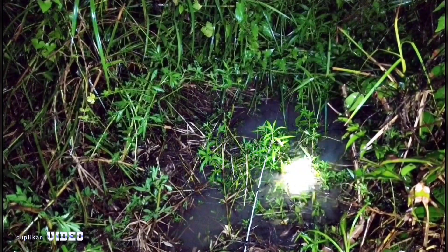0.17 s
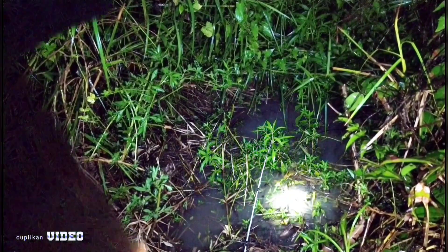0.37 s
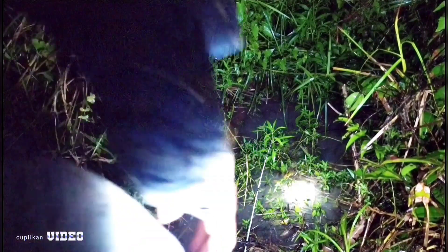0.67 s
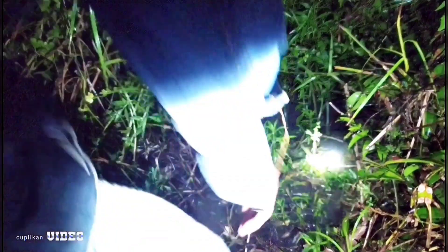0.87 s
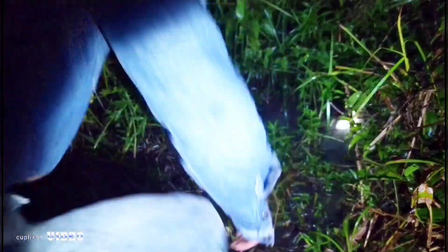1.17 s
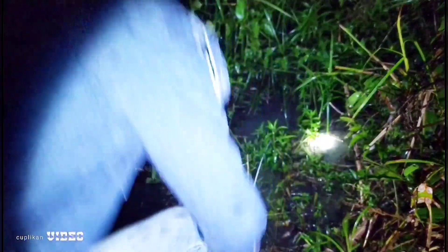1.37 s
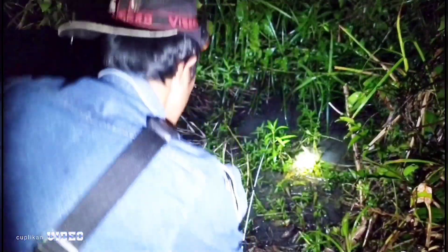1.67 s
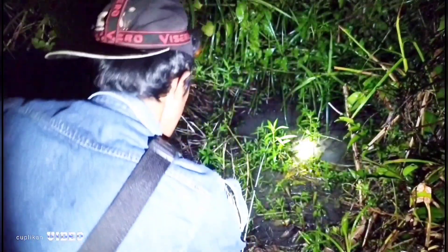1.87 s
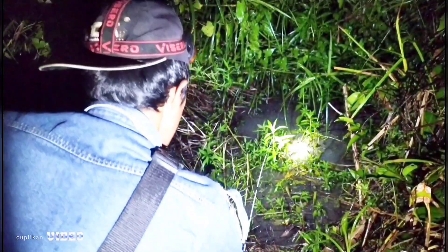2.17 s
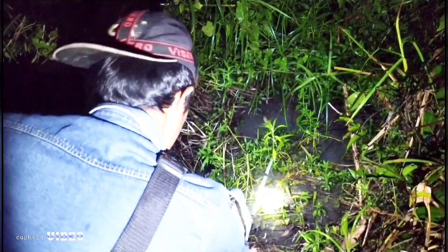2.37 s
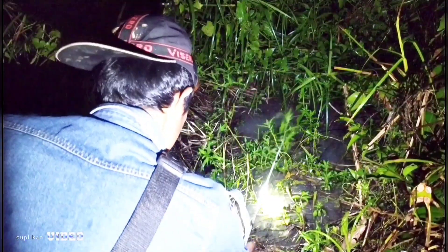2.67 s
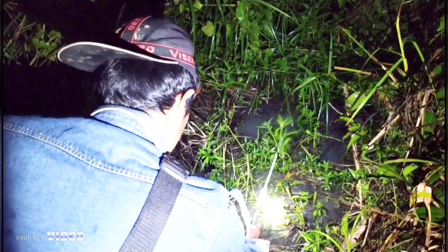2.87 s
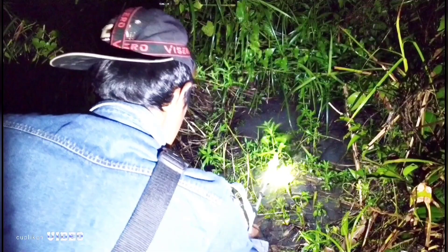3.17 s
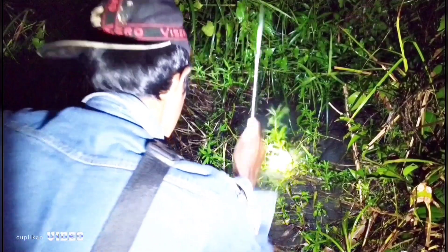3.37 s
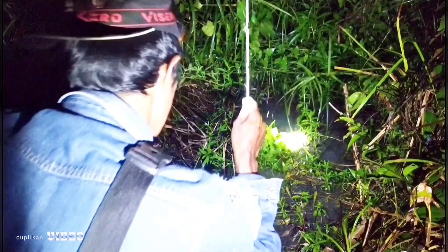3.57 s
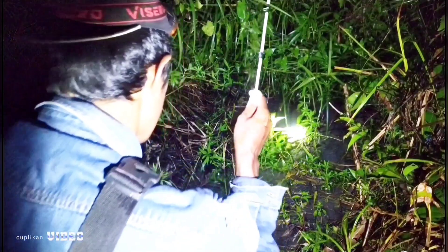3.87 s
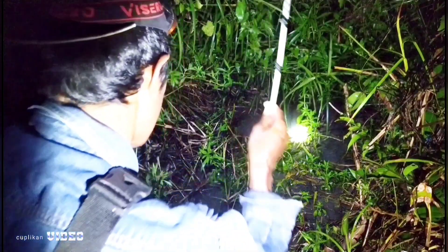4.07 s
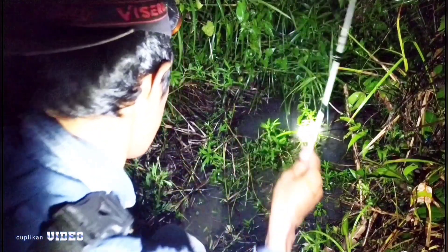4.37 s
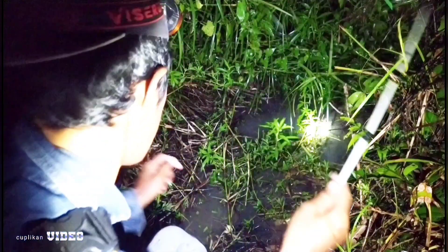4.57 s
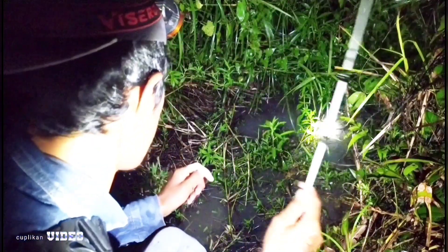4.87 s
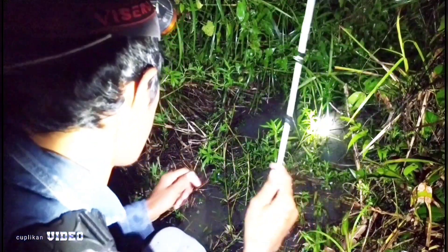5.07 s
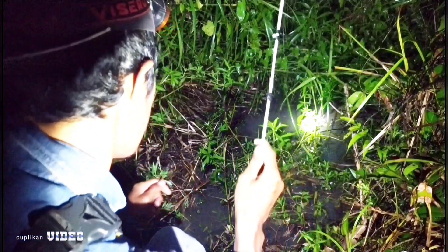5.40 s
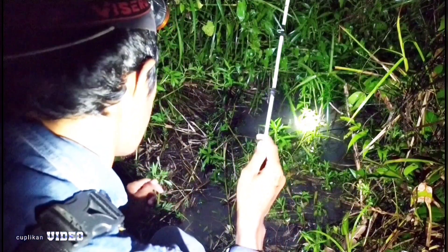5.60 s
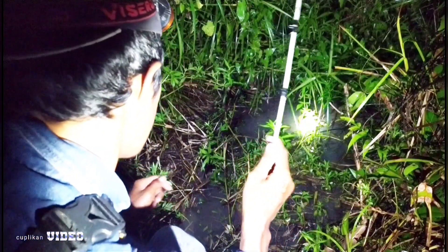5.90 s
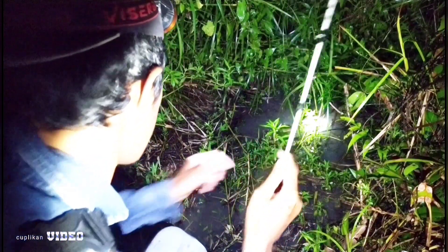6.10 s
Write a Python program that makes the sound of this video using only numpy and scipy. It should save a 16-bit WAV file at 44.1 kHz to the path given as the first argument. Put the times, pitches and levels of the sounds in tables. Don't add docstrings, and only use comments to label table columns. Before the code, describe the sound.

Shrill crickets drone throughout an open wet place at night. First a near frog peeps brightly about five times a second, while another rattles across the water and low hoarse pipes sound on the left. Feet press soggy ground, blades hiss on cloth and stems snap, ending in a crackling tear. Then fainter frogs alternate, a stronger rattle joins on the right, and tiny bubbles blip near the end. A weak distant engine hum wavers underneath; two spaced microphones.

```python
import sys
import numpy as np
from scipy import signal
from scipy.io import wavfile
from scipy.ndimage import uniform_filter1d

SR = 44100
rng = np.random.default_rng(int(sys.argv[2]) if len(sys.argv) > 2 else 0)


def decibels_to_gain(level_db):
    exponent = np.asarray(level_db, float) / 20
    return 10 ** exponent


def to_wav(s):
    ch = np.atleast_2d(s).T
    pcm = np.round(np.clip(ch, -1, 1) * 32767)
    wavfile.write(sys.argv[1], SR, pcm.astype(np.int16))


N = 275182


def evened(x):
    return x / np.sqrt(np.mean(x ** 2) + 1e-20)


def read(points, hz):
    f, value = np.transpose(points)
    return np.interp(np.log(hz + 1), np.log(f + 1), value)


def follow(rows):
    s, value = np.transpose(rows)
    return np.interp(np.arange(N) / SR, s, value)


def add(mix, s, sound):
    part = mix[..., round(s * SR):][..., :sound.shape[-1]]
    part += sound[..., :part.shape[-1]]


def resonate(x, hz, width):
    r = np.exp(-np.pi * width / SR)
    bend = 2 * r * np.cos(2 * np.pi * hz / SR)
    return signal.lfilter([2 * (1 - r), -bend * (1 - r)], [1, -bend, r ** 2], x)


def roughness(size):
    return evened(uniform_filter1d(rng.standard_normal(N), size=size))


def hiss(spectrum, patchy_db, flicker_db, same):
    frames, hz = N // 128 + 5, np.fft.rfftfreq(512, 1 / SR)
    a, b, c, d, patches = rng.standard_normal((frames, 257, 5)).T
    patches = uniform_filter1d(patches, size=6, axis=0)
    patches = evened(uniform_filter1d(patches, size=16, axis=1))
    alike = np.clip(read(same, hz), -1, 1)[:, None]
    left = a + 1j * b
    right = alike * left + np.sqrt(1 - alike ** 2) * (c + 1j * d)
    flicker = flicker_db * rng.standard_normal(frames)
    z = np.array([left, right]) * decibels_to_gain(read(spectrum, hz)[:, None] + patchy_db * patches + flicker)
    return evened(signal.istft(z, nperseg=512, noverlap=384)[1][:, :N])


def reeds(x, t60):
    at = np.arange(200, 12000, 20) + rng.integers(0, 20, (2, 590))
    echoes = rng.choice([-1., 1.], at.shape) * decibels_to_gain(-60 * at / SR / t60)
    taps = np.zeros((2, 12100))
    np.put_along_axis(taps, at, echoes, axis=1)
    return signal.fftconvolve(x, taps / np.linalg.norm(taps[0]), axes=1)[:, :N]


def breeze():
    rumble = resonate(rng.standard_normal((2, N)), 28, 35)
    return decibels_to_gain(-60.0) * evened(resonate(rumble, 30, 35))


# pitch_hz, likeness
FAR_LIKENESS = [(30, 0.51), (100, 0.95), (200, 0.85), (500, -0.54), (1400, -0.51), (2500, -0.083),
                (15000, 0.0067)]
# pitch_hz, level_db per Hz
NIGHT_COLOUR = [(12, -38), (20, 2), (161, 1.5), (265, -20.5), (639, -45), (1690, 2), (2040, -8.5),
                (2530, 0.5), (3210, -11.5), (3880, 1), (5030, -10.5), (5400, -5.5), (5800, -4), (7540, -66),
                (12800, -120)]
# time_s, level_db
NIGHT_SWELL = [(0.0, -1.1), (1.9, 1), (2.05, -0.44), (2.2, 0.033), (5.85, 1), (6.02, -1.5), (6.15, 0.66),
               (6.24, 0)]


def night_murmur():
    sound = hiss(NIGHT_COLOUR, patchy_db=1.5, flicker_db=.3, same=FAR_LIKENESS)
    return decibels_to_gain(-44.5 + follow(NIGHT_SWELL)) * sound


# pitch_hz, level_db per Hz
INSECT_COLOUR = [(7500, -21), (9000, -19), (10000, -44), (11500, 3), (14200, 12), (14800, 20), (16000, -18)]
# time_s, level_db
INSECT_SWELL = [(0.0, -4), (2.2, -2), (2.6, -1), (4.5, 1), (6.24, -1)]


def far_insects():
    sound = hiss(INSECT_COLOUR, patchy_db=1.6, flicker_db=1.2, same=FAR_LIKENESS)
    return decibels_to_gain(-51.5 + follow(INSECT_SWELL)) * sound


# time_s, level_db
ENGINE_LEVEL = [(0.0, -58), (1.1, -53), (2.0, -59), (2.75, -58), (2.92, -49.5), (3.79, -45.5),
                (4.36, -48.5), (4.8, -50.5), (4.9, -62), (5.13, -48), (5.35, -58), (6.24, -53)]


def engine_hum():
    waver_db, wander_hz = 3.2 * roughness(3000), 4 * roughness(3000)
    tone = np.sin(2 * np.pi * np.cumsum(157.8 + wander_hz) / SR)
    return decibels_to_gain(follow(ENGINE_LEVEL) - 7.0 + waver_db) * tone


# time_s, level_db
CRICKET_LEVEL = [(0.0, -43.5), (.405, -43.5), (.417, -47), (.425, -38), (.433, -42.5), (1.6, -42.5),
                 (2.22, -42.5), (2.25, -51), (2.325, -49), (2.35, -42.5), (5.46, -42), (6.24, -42.5)]
# pitch_hz, width_hz, level_db
WINGS = [(6486, 345, -6), (6707, 200, -5), (6973, 140, -5.5), (7250, 170, -6.5), (8300, 980, -11)]


def crickets():
    t, out = np.arange(N) / SR, np.zeros((2, N))
    for hz, width, db in WINGS:
        throb = 1 + 0.035 * np.sin(2 * np.pi * (rng.uniform(52, 110) * t + rng.random((2, 1))))
        struck = rng.random((2, N)) < 900 / SR
        wing = resonate(rng.standard_normal((2, N)) * struck * throb, hz, width)
        wing = resonate(resonate(wing, hz, 2 * width), hz, 2 * width)
        out += decibels_to_gain(db) * evened(wing)
    pan_db = np.array([[.8], [-.8]])
    return decibels_to_gain(follow(CRICKET_LEVEL) + 3 + pan_db) * evened(out)


# pitch_hz, width_hz, level_db
RATTLE_RINGS = [(3870, 206, 3), (3705, 430, 5.5), (3976, 830, -2.5), (1400, 31, -28), (2280, 2180, 4),
                (5035, 490, -9)]


def rattlers(rows, per_s, uneven_db, ring_hz, ring_db, body_db, lag, pan_db):
    clicks = np.zeros((2, N))
    for s, db, length, own_db, surge in rows:
        chance = rng.standard_normal((3, 56))
        t = np.cumsum(1 + 0.3 * chance[0].clip(-2, 2)) / per_s - 1 / per_s
        level_db = db - 19.2 * (t / length) ** 2
        level_db -= 0.69 * (1 - t / .009).clip(0)
        level_db += uneven_db * chance[1].clip(-2, 1.5)
        level_db += 3.5 * np.exp(-((t - surge) / .0021) ** 2)
        at = ((s + t) * SR).astype(int).clip(0, N - 1)
        clicks[:, at] = decibels_to_gain(level_db) * np.sign(chance[2]) * decibels_to_gain(np.array([[own_db], [0]]))
    tight, loose = signal.sosfilt(signal.butter(6, 1300, "high", fs=SR, output="sos"), clicks)

    def ring(x, hz, width, db):
        return decibels_to_gain(db) * resonate(resonate(x, hz, width), hz, 0.68 * width) * 900 / width

    rest = sum(ring(tight, *mode) for mode in RATTLE_RINGS[1:3])
    rest = rest + sum(ring(loose, *mode) for mode in RATTLE_RINGS[3:])
    body = decibels_to_gain(body_db) * resonate(loose, 1545, 320)
    left, right = decibels_to_gain(ring_db) * ring(tight, ring_hz, *RATTLE_RINGS[0][1:]) + rest + body
    return 12 * np.array([decibels_to_gain(pan_db / 2) * np.roll(left, int(lag)), decibels_to_gain(-pan_db / 2) * right])


# start_s, level_db
ACROSS_CALLS = [(0.098, -34.5), (0.193, -34.5), (0.302, -33), (0.4221, -33), (0.53, -35), (0.639, -45.5),
                (0.7232, -40.5), (0.891, -65), (1.322, -34), (1.455, -33), (1.5883, -34.5), (1.702, -30.5),
                (1.825, -31.5), (1.9794, -32), (2.094, -31), (2.225, -33), (2.383, -30), (2.491, -31),
                (2.602, -29), (2.7213, -29), (2.794, -36.5), (2.845, -32), (2.963, -29), (3.102, -31.5),
                (3.218, -30), (3.3414, -32.5), (3.468, -36), (3.5754, -34), (3.682, -33), (3.756, -34),
                (3.891, -35.5), (4.029, -33.5), (4.456, -31.5), (4.572, -32.5), (4.704, -31), (4.794, -40),
                (5.175, -47), (5.325, -37), (5.459, -39), (6.203, -44)]


def rattlers_across():
    rows = [(s, db, .06 if s < 2.3 else .025, -.1, .01) for s, db in ACROSS_CALLS]
    sound = rattlers(rows, per_s=520, uneven_db=2.0, ring_hz=3950, ring_db=np.array([[-3], [-3]]),
                     body_db=-2.5, lag=-7, pan_db=2.9)
    return decibels_to_gain(-5) * sound + decibels_to_gain(-5.5) * reeds(sound, 0.053)


# start_s, level_db, length_s, sac_ring_db, surge_after_s
RIGHT_CALLS = [(4.158, -34, 0.083, -5.5, .04), (4.272, -28, 0.04, -5.5, .009),
               (4.3824, -28, 0.028, -2, 0.0069), (4.4926, -26.5, 0.031, -1.5, 0.0065),
               (4.6053, -26, 0.03, -1, 0.0091), (4.7224, -27, 0.028, -0.5, 0.0061),
               (4.8446, -27, 0.034, -0.5, 0.014), (4.9706, -27.5, 0.034, 0, 0.013),
               (5.098, -26.5, 0.027, -2, 0.012), (5.2295, -27, 0.028, -2.5, .014),
               (5.356, -27, 0.025, 1.5, .015), (5.485, -26.5, 0.029, -3.5, 0.0076),
               (5.6286, -28, 0.028, -2.5, 0.014), (5.776, -27.5, 0.022, -0.5, 0.0059)]


def rattler_on_right():
    sound = rattlers(RIGHT_CALLS, per_s=480, uneven_db=1.5, ring_hz=3859,
                     ring_db=np.array([[-6], [1.5]]), body_db=-9.0, lag=3.6, pan_db=0.5)
    return sound + decibels_to_gain(2.5) * reeds(sound, 0.082)


# share_of_pitch, level_db
OVERTONES = [(1, 0), (.5, -30), (.75, -26), (1.25, -36), (1.5, -32)]


def note(hz, length, hz_per_s, rise, fall, sac=(), settle=10):
    t = np.arange(int(length * SR)) / SR
    pitch = hz + hz_per_s * settle * (1 - np.exp(-t / settle))
    shape = np.clip(t / rise, 0, 1) ** 1.2 * np.clip((length - t) / fall, 0, 1)
    shape *= 0.08 + sum(decibels_to_gain(db) / (1 + ((pitch - f) / width) ** 2) for f, width, db in sac)
    shape *= 1 - .72 / (1 + ((pitch - 2838) / 28) ** 2)
    shape *= 1 + 0.1 * np.sin(2 * np.pi * (rng.uniform(122, 248) * t + rng.random()))
    turns = np.cumsum(pitch) / SR
    tone = sum(decibels_to_gain(db) * np.sin(2 * np.pi * share * turns) for share, db in OVERTONES)
    return shape / shape.max() * tone


def peepers(rows, lag, pan_db, low_note_db, below_hz, hz_per_s, settle, extra, sac):
    out = np.zeros(N)
    for s, db, hz, wait, *own_db in rows:
        lead = note(hz - 750, 0.011, hz_per_s=44000, rise=0.0035, fall=0.0012)
        add(out, s - .008, decibels_to_gain(db - 23.5) * lead)
        high = note(hz - below_hz, wait + extra, hz_per_s, rise=0.0048, fall=0.0044, sac=sac, settle=settle)
        add(out, s - .0025, decibels_to_gain(db - 1.26) * high)
        low = note(.722 * hz - 120, .022, hz_per_s=13800, rise=0.0022, fall=0.0056, sac=sac, settle=0.068)
        low_db = db + low_note_db + sum(own_db) - .025 * (hz - 2630)
        add(out, s + wait + 0.00052, decibels_to_gain(low_db) * low)
    return np.array([out, np.roll(out, int(lag)) * decibels_to_gain(-pan_db)])


# start_s, level_db, pitch_hz
PIPER_NOTES = [(0.196, -53, 1760), (1.101, -29, 1537), (1.327, -27.5, 1620), (1.465, -29.5, 1615),
               (1.6077, -32, 1584), (1.891, -31.5, 1585), (2.0248, -31.5, 1603), (2.181, -33, 1528),
               (3.35, -43, 1415), (3.471, -36, 1384), (3.7117, -39, 1400), (4.778, -45, 1600),
               (5.711, -33.5, 1316), (6.189, -34, 2025), (6.2034, -35, 1540), (6.22, -37, 1495)]
# start_s, level_db, pitch_hz, length_s, glide_hz_per_s
TRAILING_CALL = (5.528, -38, 2750, .062, -2200)


def pipers():
    out = np.zeros(N)
    for s, db, hz in PIPER_NOTES:
        add(out, s - .008, decibels_to_gain(db) * note(hz - 50, .022, hz_per_s=5000, rise=.009, fall=.009))
    s, db, hz, length, hz_per_s = TRAILING_CALL
    add(out, s, decibels_to_gain(db) * note(hz, length, hz_per_s, rise=0.0036, fall=0.078))
    out *= 1 + .5 * roughness(90)
    return np.array([decibels_to_gain(1.2) * out, decibels_to_gain(-1.2) * np.roll(out, shift=12)])


# start_s, level_db, pitch_hz, wait_for_low_note_s
FAR_CALLS = [(2.9614, -36, 2510, 0.012), (3.2865, -30.5, 2546, 0.0092), (3.5174, -32, 2460, 0.0046),
             (3.6424, -27.5, 2585, 0.0066), (3.7922, -30, 2485, 0.0083), (3.9078, -28, 2550, 0.015),
             (4.0558, -32.5, 2510, 0.0078), (4.1748, -28, 2600, 0.017), (4.318, -30.5, 2500, 0.0078),
             (4.4332, -27.5, 2630, 0.019), (4.58, -32, 2500, 0.003), (4.6892, -28, 2590, .022),
             (4.9533, -27.5, 2560, 0.02), (5.1019, -32, 2530, 0.015), (5.2255, -28, 2585, 0.021),
             (5.3903, -28.5, 2560, 0.0055), (5.5049, -30.5, 2520, 0.025), (5.858, -31.5, 2520, 0.012)]
# pitch_hz, width_hz, level_db
FAR_RINGS = [(2600, 200, 8), (2810, 140, -7), (1960, 250, 3)]


def far_frogs():
    sound = peepers(FAR_CALLS, lag=12.6, pan_db=2.5, low_note_db=-9.0, below_hz=73, hz_per_s=22000,
                    settle=0.014, extra=0.007, sac=FAR_RINGS) + pipers()
    return sound + decibels_to_gain(-7) * reeds(sound, 0.14)


# start_s, length_s, first_pitch_hz, last_pitch_hz, level_db
BUBBLE_RINGS = [
    (5.682, 0.038, 365, 1320, -51.5),
    (5.705, 0.051, 375, 502, -47),
    (5.752, 0.044, 493, 1246, -51.5),
    (5.847, 0.014, 720, 1400, -58),
    (6.113, 0.01, 282, 340, -45.5),
    (6.113, .035, 267, 933, -51.5),
    (6.123, 0.013, 687, 1290, -52.5),
    (6.193, 0.023, 940, 730, -57.5),
]


def bubbles():
    out = np.zeros(N)
    for s, length, first_hz, last_hz, db in BUBBLE_RINGS:
        way = np.arange(0, length, 1 / SR) / length
        pitch = first_hz * (last_hz / first_hz) ** way ** 1.2
        ring = np.sin(2 * np.pi * np.cumsum(pitch) / SR) * signal.windows.tukey(len(way), .15)
        add(out, s, decibels_to_gain(db + 5.5 + 2 * way) * ring)
    return out * (1 + .45 * roughness(120))


def strokes(rows, rest_db, rise_db_s, fall_db_s):
    t = np.arange(0, N, 64) / SR
    s, db, hold = np.transpose(rows)[:, :, None]
    level_db = db - rise_db_s * (s - t).clip(0) - fall_db_s * (t - s - hold).clip(0)
    power = decibels_to_gain(2 * rest_db) + decibels_to_gain(2 * level_db).sum(0)
    return np.interp(np.arange(N) / SR, t, np.sqrt(power))


# pitch_hz, likeness
NEAR_LIKENESS = [(30, .6), (130, 1), (300, 0.62), (640, 0.23), (1400, 0.11), (3000, 0.11), (15000, 0.13)]
# pitch_hz, level_db per Hz
BRUSH_COLOUR = [(180, -49), (300, -21), (1170, -9.5), (1800, -11.5), (2470, -8), (3160, -5), (3490, -3),
                (5290, -11.5), (6890, -3), (15800, -15.5)]
# start_s, level_db, hold_s
BRUSH_STROKES = [(0.0, -43, 0.0086), (0.05, -52, 0.15), (1.15, -54, 0.04), (0.71, -50, 0.022),
                 (0.85, -53, 0.037), (1.02, -43, 0.011), (1.08, -45.5, 0.048), (1.195, -50, .006),
                 (1.22, -51, .02), (1.265, -46, .012), (1.3, -47, .02), (1.33, -42.5, 0.05),
                 (1.4, -48, 0.059), (1.56, -51.5, 0.047), (1.9, -44, 0.0042), (2.12, -48.5, 0.0087),
                 (2.252, -40, 0.015), (2.275, -35, 0.015), (2.305, -35, 0.025), (3.385, -49, 0.04),
                 (3.43, -44.5, 0.013), (3.455, -48, .01), (3.472, -44.5, 0.017), (3.58, -54, 0.11),
                 (4.5, -60, 0.43), (5.33, -84, .01), (5.63, -57, 0.011), (5.78, -62, 0.074),
                 (5.98, -67, 0.023), (6.13, -49.5, 0.025)]


def brushing_grass():
    snaps = rng.standard_normal((2, N)).clip(-1.6, 1.6)
    snaps *= decibels_to_gain(1.1 * rng.exponential(size=(2, N)).clip(0, 4))
    snaps *= rng.random((2, N)) < 500 / SR
    snaps = evened(resonate(snaps, 8200, 6500) + resonate(snaps, 4100, 1500))
    brush = hiss(BRUSH_COLOUR, patchy_db=4.5, flicker_db=2.5, same=NEAR_LIKENESS) + decibels_to_gain(-9) * snaps
    return decibels_to_gain(7.0) * strokes(BRUSH_STROKES, -55.5, rise_db_s=447.0, fall_db_s=600) * brush


# pitch_hz, level_db per Hz
TREAD_COLOUR = [(60, -34), (140, -2), (260, 5), (500, 5), (900, 0.5), (1500, 1.5), (3000, 1.5),
                (6000, -9.5)]
# start_s, level_db, hold_s
FOOTSTEPS = [(0.0, -39.5, 0.021), (0.1, -39, 0.005), (0.2, -41, 0.12), (0.4, -55, .25),
             (0.69, -46.5, 0.022), (0.85, -45.5, 0.0046), (1.0, -39.5, 0.028), (1.04, -34, 0.014),
             (1.11, -41, 0.0085), (1.197, -32.5, 0.0036), (1.25, -42, 0.075), (1.396, -41, 0.027),
             (1.56, -48, 0.19), (2.33, -53, 0.0028), (2.5, -47.5, 0.005), (3.39, -47, 0.011),
             (3.47, -56, 0.011), (3.61, -55, 0.033), (5.72, -52, 0.021), (5.78, -55, 0.023),
             (6.14, -45.5, 0.0056)]


def footsteps():
    tread = hiss(TREAD_COLOUR, patchy_db=2.2, flicker_db=1.6, same=NEAR_LIKENESS)
    return strokes(FOOTSTEPS, -54, rise_db_s=432, fall_db_s=333) * tread


def ticks(rows, t60):
    t, out = np.arange(0, .02, 1 / SR), np.zeros((2, N))
    for s, db in rows:
        burst = rng.standard_normal((3, len(t)))
        shape = decibels_to_gain(db - 60 * t / t60) * np.minimum(t / .0004, 1)
        add(out, s, shape * (burst[:2] + 0.54 * burst[2]))
    return out


# start_s, level_db
STEM_CRACKS = [(0.9404, -32), (1.095, -22), (1.107, -27), (1.1937, -39), (1.3245, -20), (1.5953, -42),
               (1.845, -44), (1.8706, -45), (1.8996, -27), (2.2528, -24), (2.672, -42), (2.756, -35),
               (3.434, -24), (3.4725, -25), (3.484, -25), (3.5595, -25)]
# start_s, level_db
TEARS = [(1.2674, -32), (2.2502, -31), (2.2545, -26), (2.2614, -23), (2.2665, -20), (2.278, -24),
         (2.285, -22), (2.2913, -22), (2.3085, -14), (2.3176, -20), (2.3265, -21), (2.3295, -18)]
# start_s, level_db
WET_STEPS = [
    (1.034, -39),
    (1.043, -41),
    (1.106, -24),
    (1.196, -30),
    (1.225, -42),
    (1.295, -45),
    (1.394, -37),
]


def twigs():
    dry_snaps = decibels_to_gain(-10.5) * ticks(STEM_CRACKS, 0.026) + decibels_to_gain(-7.5) * ticks(TEARS, 0.0086)
    wet = ticks(WET_STEPS, .03)
    bright = resonate(dry_snaps, 8100, 8300) + decibels_to_gain(-12) * resonate(dry_snaps, 2500, 3000)
    return bright + decibels_to_gain(1.5) * resonate(wet, 660, 1050)


# start_s, level_db, pitch_hz, wait_for_low_note_s, low_note_db
CLOSE_CALLS = [(0.0429, -10, 2602, 0.0094, 1), (0.2853, -8.5, 2647, 0.013, -4),
               (0.4937, -9, 2600, 0.0095, -1), (0.6963, -9, 2687, 0.016, 0), (0.86, -10, 2638, 0.0088, 1.5),
               (1.0049, -8.5, 2705, 0.018, 1.5), (1.3373, -9, 2683, 0.016, 1),
               (1.5483, -9, 2630, 0.016, -1), (1.7268, -8.5, 2678, 0.02, -1),
               (1.9435, -11.5, 2560, 0.0069, -0.5), (2.1057, -10, 2700, 0.022, 2.5)]
# pitch_hz, width_hz, level_db
CLOSE_RINGS = [(2690, 140, 0), (2925, 70, -1), (1930, 260, 0)]


def close_frog():
    sound = peepers(CLOSE_CALLS, lag=21, pan_db=3.2, low_note_db=-12.8, below_hz=185, hz_per_s=25000,
                    settle=.032, extra=.0075, sac=CLOSE_RINGS)
    return sound + decibels_to_gain(-15) * reeds(sound, 0.25)


def scene():
    background = breeze() + night_murmur() + far_insects() + engine_hum() + crickets()
    far_voices = rattlers_across() + rattler_on_right() + far_frogs()
    person = bubbles() + brushing_grass() + footsteps() + twigs()
    return background + far_voices + person + close_frog()


def low_pass(x):
    return signal.sosfilt(signal.butter(12, 15990, fs=SR, output="sos"), x)


# pitch_hz, level_db
LEFT_OVER_RIGHT = [(20, 1.5), (8000, -1), (10000, 9), (15000, 0)]
# pitch_hz, level_db
GATE = [(250, -30), (400, -6), (900, -6.5), (1200, -3.3), (3100, -4), (4000, -7), (4800, -.5), (5300, -.5),
        (5800, 4.5), (6200, -10), (7500, -9), (7900, -1.2), (9600, .8), (11000, -.8), (14000, -1),
        (14900, 3.3)]


def record(dry):
    hz, _, z = signal.stft(dry, SR, nperseg=2048, noverlap=1536)
    z *= decibels_to_gain(read(LEFT_OVER_RIGHT, hz)[:, None] * np.array([.5, -.5])[:, None, None])
    power = uniform_filter1d((abs(z) ** 2).mean(0), size=3, axis=1)
    wide, narrow = uniform_filter1d(power, size=9, axis=0), uniform_filter1d(power, size=5, axis=0)
    band = np.where(hz[:, None] > 7600, wide, narrow)
    steady = uniform_filter1d(np.median(band, axis=1), size=9)[:, None]
    nearby = uniform_filter1d(np.log(band + 1e-14), size=41, axis=0)
    nearby = np.exp(uniform_filter1d(nearby, size=5, axis=1))
    usual = np.where(hz[:, None] > 8600, np.sqrt(steady * nearby), steady)
    bar = usual * decibels_to_gain(2 * read(GATE, hz))[:, None]
    z *= np.clip(band / bar, 0, 1) ** 20 * (hz < 15800)[:, None]
    mix = signal.istft(z, SR, nperseg=2048, noverlap=1536)[1][:, :N]
    return low_pass(mix)


dry = scene()
out = record(dry)
to_wav(out)
```